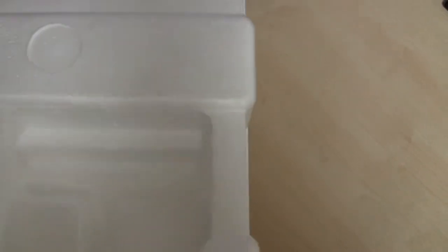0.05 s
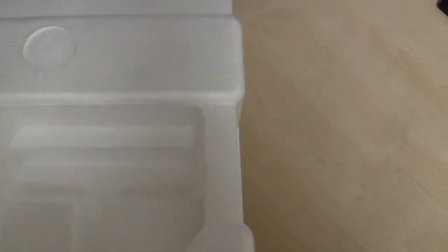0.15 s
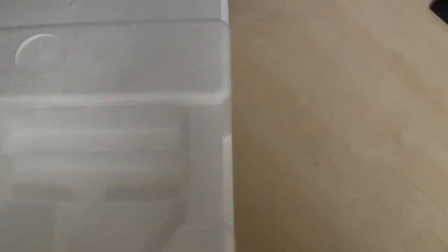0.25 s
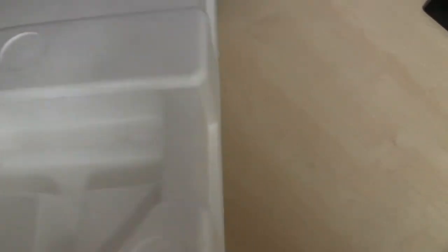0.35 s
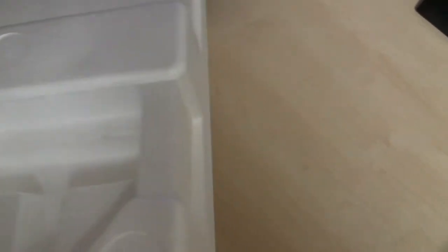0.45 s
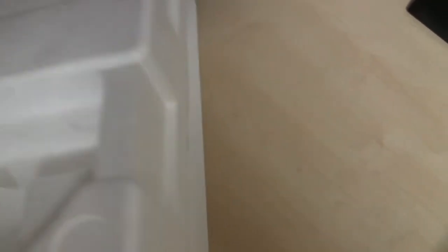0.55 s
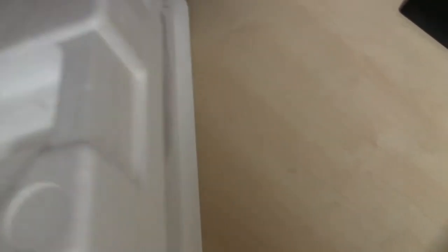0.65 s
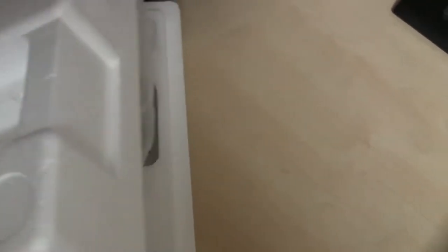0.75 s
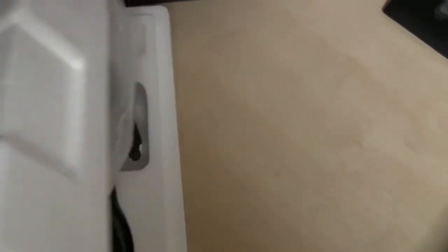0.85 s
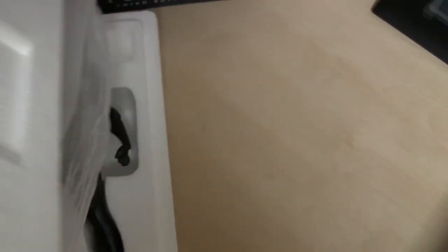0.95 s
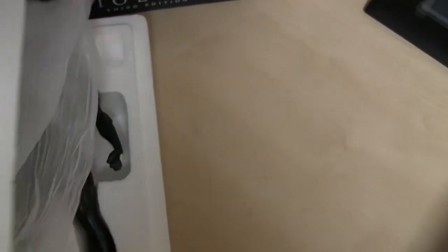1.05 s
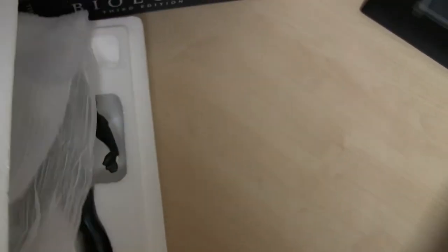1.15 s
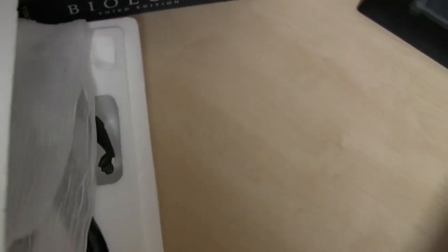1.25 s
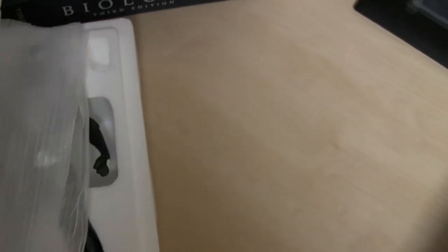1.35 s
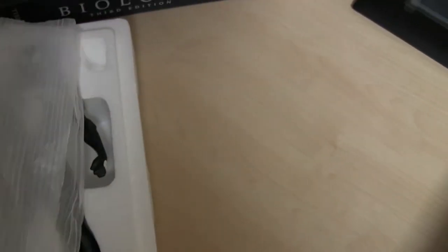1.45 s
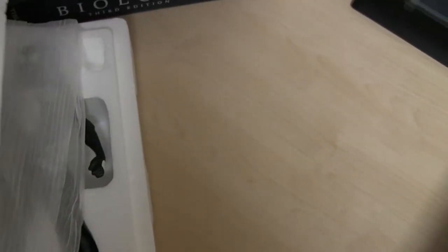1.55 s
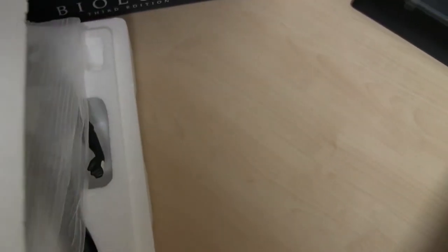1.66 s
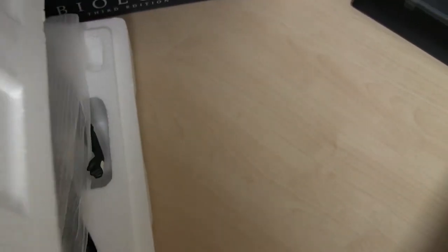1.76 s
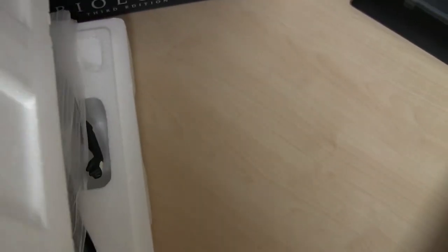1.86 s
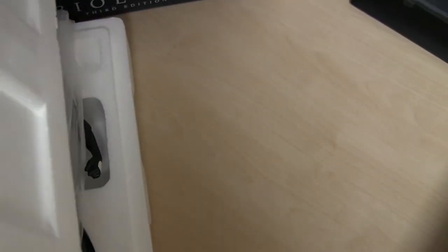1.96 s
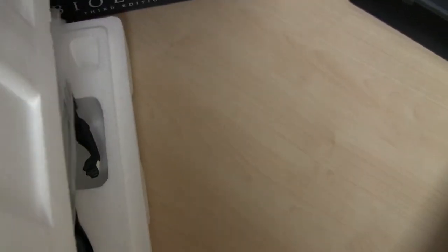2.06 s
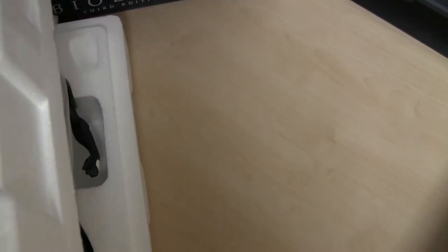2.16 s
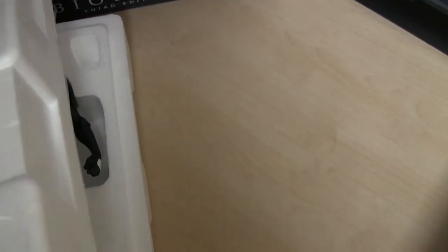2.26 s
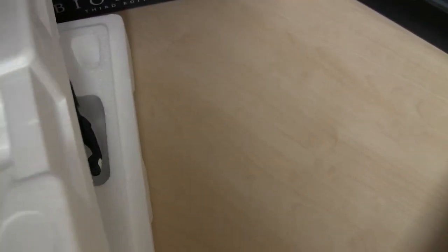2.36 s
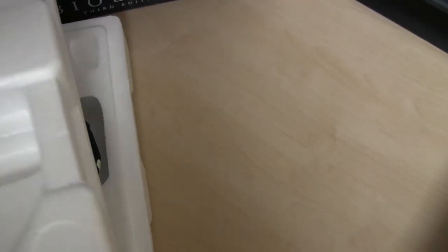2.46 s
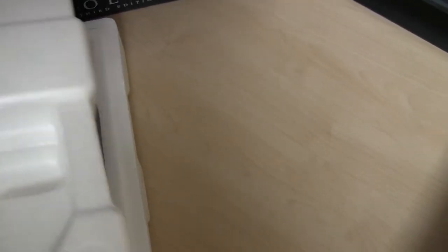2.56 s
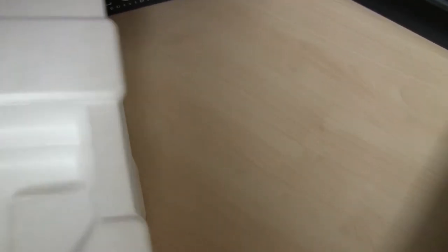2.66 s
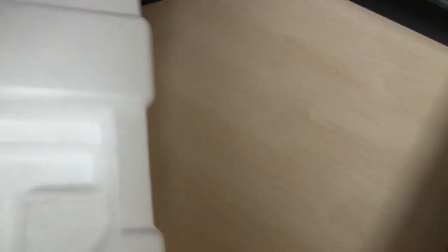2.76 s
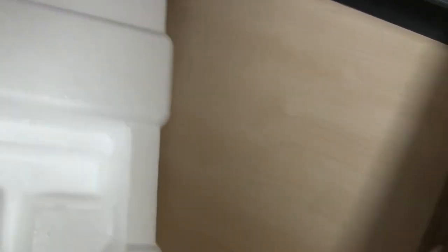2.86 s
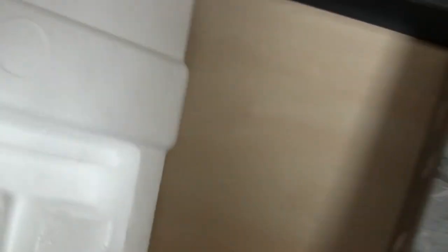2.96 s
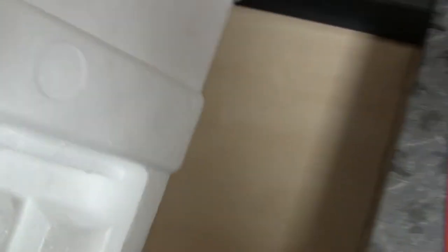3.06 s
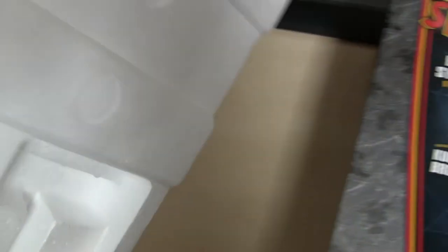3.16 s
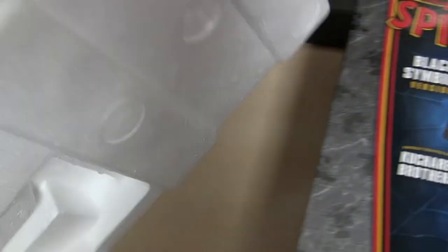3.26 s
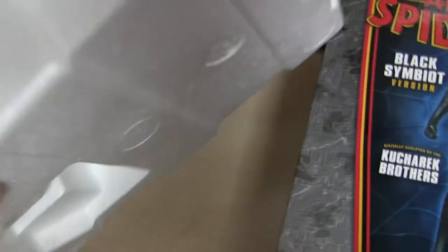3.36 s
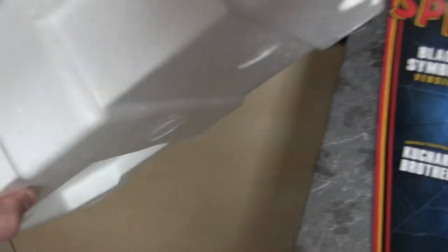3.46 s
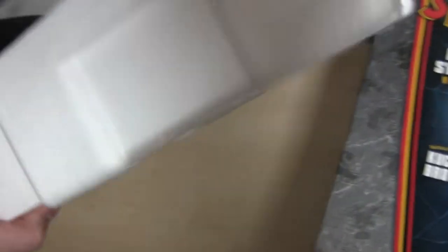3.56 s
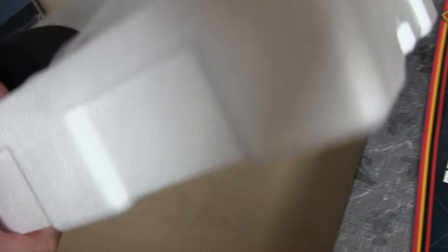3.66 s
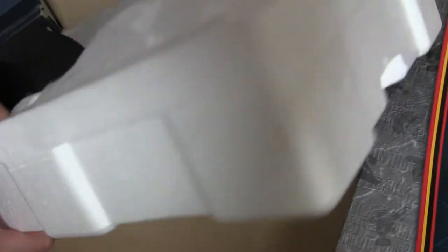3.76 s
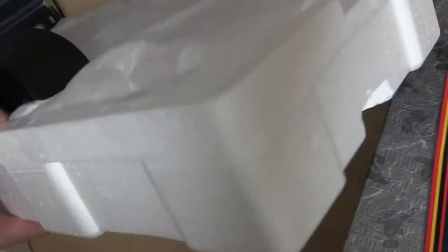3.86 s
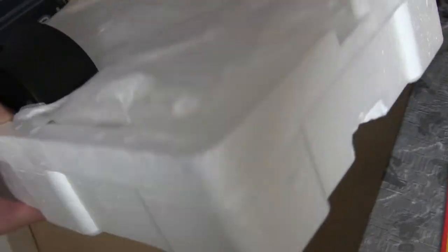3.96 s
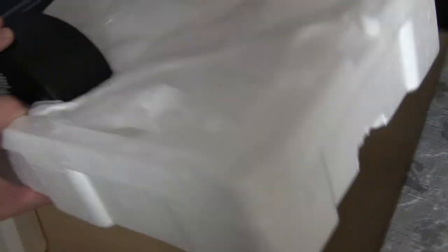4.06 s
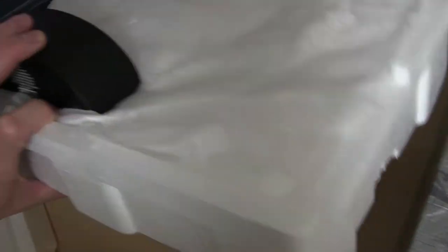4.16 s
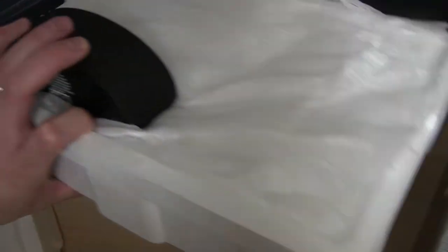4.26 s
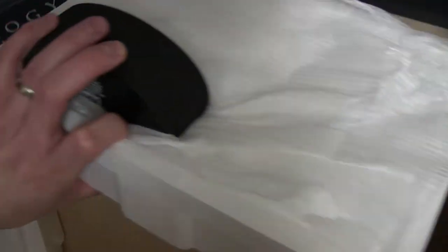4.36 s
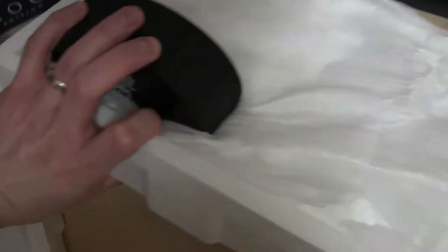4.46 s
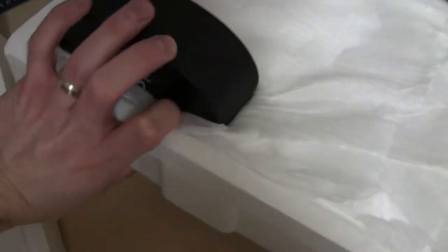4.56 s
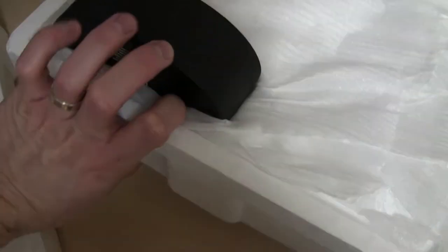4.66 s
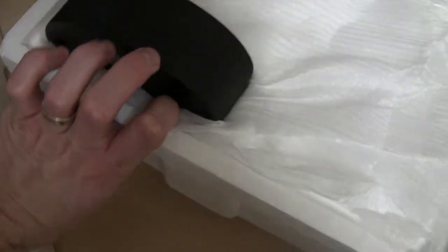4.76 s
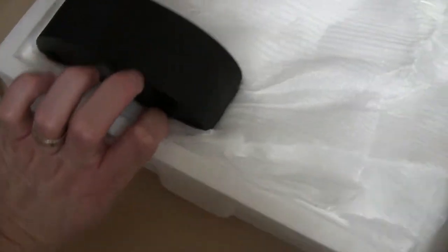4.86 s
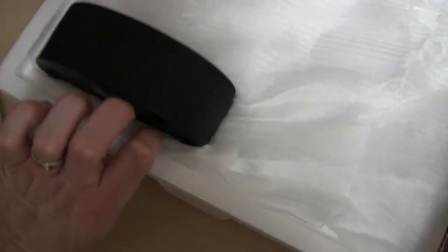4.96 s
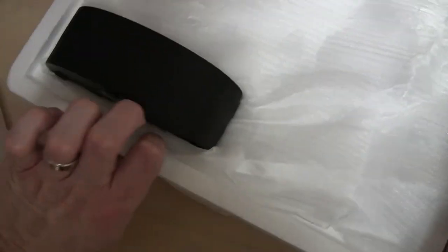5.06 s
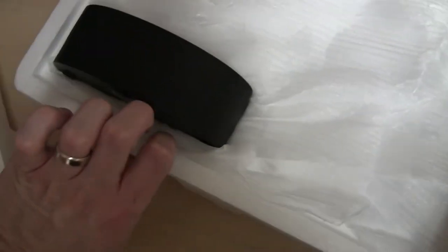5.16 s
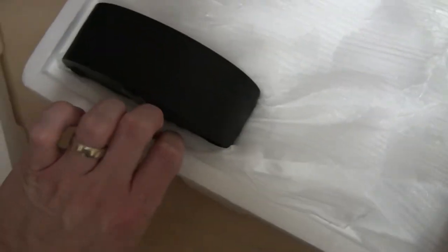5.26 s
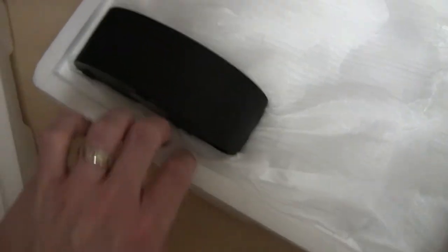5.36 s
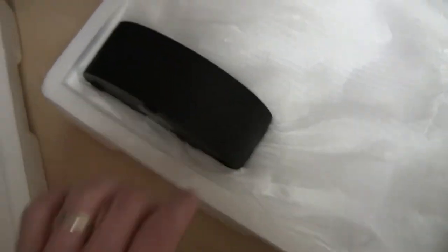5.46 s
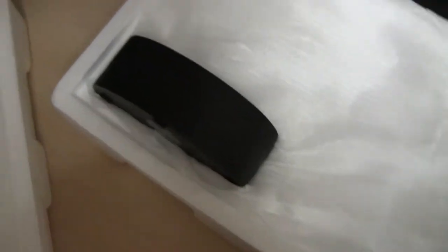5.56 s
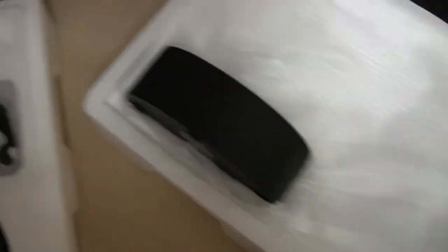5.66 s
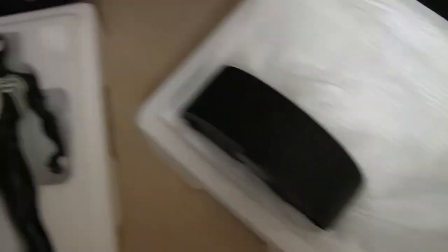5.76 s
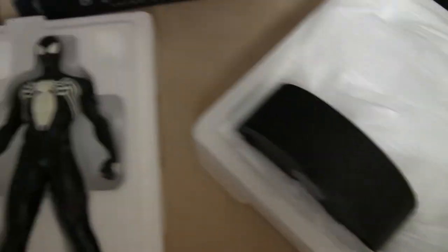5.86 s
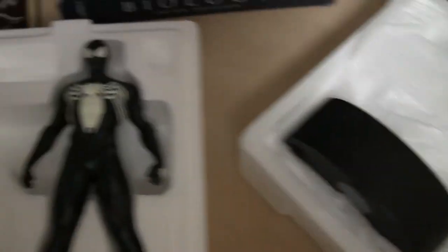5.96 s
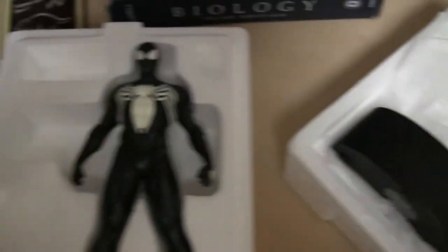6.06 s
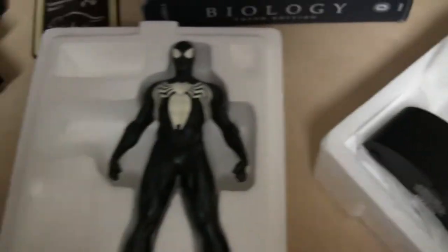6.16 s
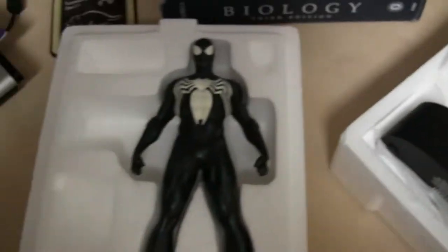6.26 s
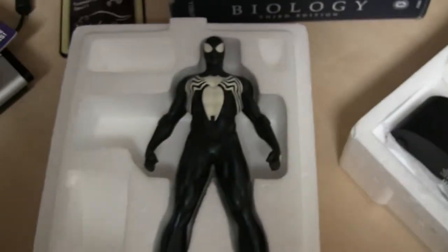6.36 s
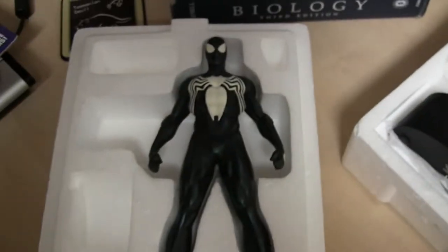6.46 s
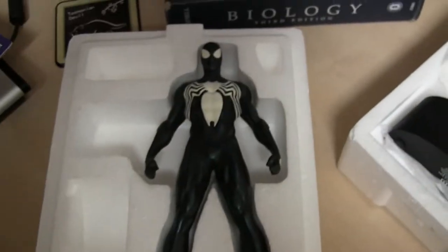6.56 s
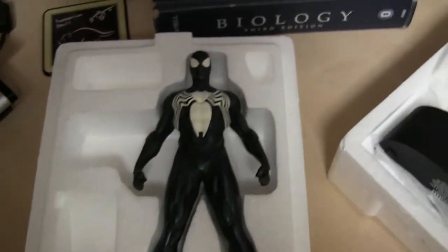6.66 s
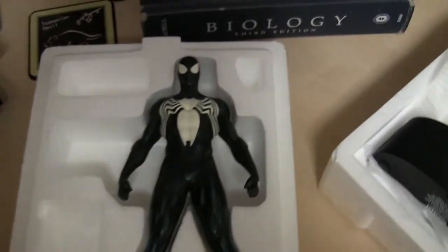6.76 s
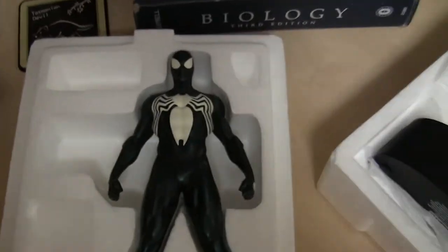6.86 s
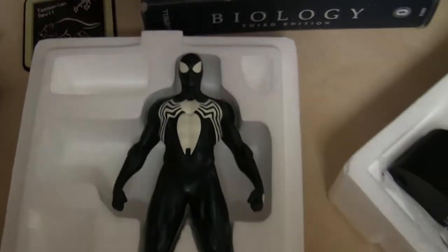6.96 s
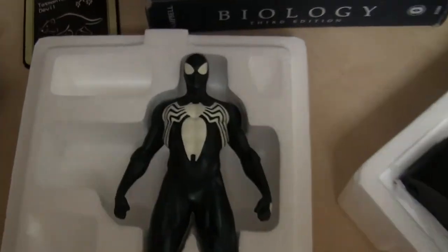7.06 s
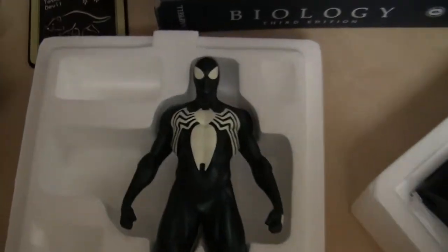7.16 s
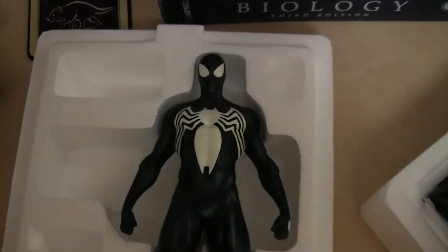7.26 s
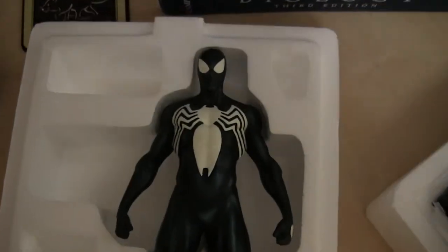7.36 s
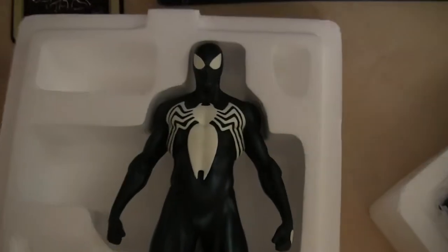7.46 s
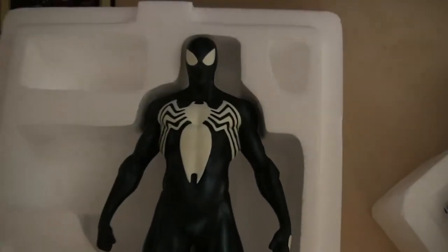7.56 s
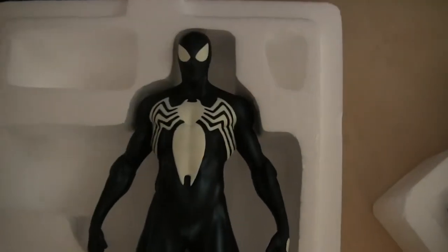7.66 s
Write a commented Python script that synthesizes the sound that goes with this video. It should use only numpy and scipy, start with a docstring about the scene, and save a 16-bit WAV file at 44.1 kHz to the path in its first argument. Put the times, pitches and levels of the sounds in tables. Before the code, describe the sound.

Foam packaging scrapes and creaks open in irregular bursts with rustling plastic wrap, then loud hollow thuds as it is set down in a small room.

```python
"""Foam rubs on foam and on plastic wrap as a two-part package is pulled open and handled on a desk.
Rubbing is bunched random clicks, filtered into scrape and hiss; stuck foam slips, creaks and groans.
Taps, hollow thuds and juddering knocks are noise puffs and fading tones as the box is opened and set down.
A faint fan is filtered noise; a tick and a thin squeak come near the end, all in a small room."""
import sys
import numpy as np
from scipy import signal
from scipy.fft import rfft, irfft, next_fast_len
from scipy.io import wavfile
from scipy.ndimage import map_coordinates

SR = 44100
rng = np.random.default_rng(int(sys.argv[2]) if len(sys.argv) > 2 else 0)


def digitize_waveform(pressure):
    """Quantize a signal to 16-bit integers and store it at the path in sys.argv[1].

    Rows of a 2-D input are taken as channels; values are limited to [-1, 1].
    """
    field = np.atleast_2d(pressure).T
    bounded = np.clip(field, -1, 1)
    quanta = np.round(bounded * 32767).astype(np.int16)
    wavfile.write(sys.argv[1], SR, quanta)


N = 340452
RING = SR // 4  # length of each short sound, in samples
TOP_HZ = 16100  # upper limit of the sound

# resonances of the box with the air in and around it: pitch_hz, level_db, t60_s (time to fall by 60 dB)
BOX_MODES = [(200.7, -6.5, .3), (233, -5, 0.63), (301, 2, 0.41), (450, 5.5, 0.28), (653, -4.5, 0.26),
             (788, 9, 0.35), (1200, -2, 0.31)]
# resonances of the foam walls: pitch_hz, width_hz, level_db
WALL_MODES = [(581, 69, 0.5), (978, 117, -1), (1472, 91, 1.5), (2080, 180, -0.5), (3270, 400, -14)]
# tone colour of a dry snap: frequency_hz, relative_level_db
SNAP_COLOUR = [(150, -6.5), (500, 0.5), (1300, 5.5), (2200, 3), (3500, -2.5), (7000, -8.5), (12000, -13),
               (16000, -27.5)]

DRAG_ATTACK_S, DRAG_RELEASE_S = 0.025, 0.033  # time to rise or fall by 20 dB


def amp(db):
    """Turn decibels into a plain gain."""
    return 10 ** (np.asarray(db) / 20)


def unit(x):
    """Scale a signal to an average power of 1."""
    return x / np.sqrt(np.mean(x ** 2) + 1e-20)


def along(points, hz):
    """Read a curve of (Hz, value) points along a logarithmic frequency axis."""
    point_hz, values = np.transpose(points)
    return np.interp(np.log(hz + 1), np.log(point_hz + 1), values)


def curve(rows):
    """Join (time, value) points into one value per sample."""
    times, values = np.transpose(rows)
    return np.interp(np.arange(N) / SR, times, values)


def fade(t60):
    """A quarter second of exponential decay, falling 60 dB in t60 seconds."""
    return np.exp(-np.log(1000) * np.arange(RING) / SR / t60)


def tone(hz, t60):
    """A damped vibration that builds up within its first cycle."""
    t = np.arange(RING) / SR
    build_up = 1 - np.exp(-np.pi * hz * t)
    return np.sin(2 * np.pi * hz * t) * fade(t60) * build_up


def add(track, s, sound):
    """Mix a sound into a track at time s."""
    part = track[max(round(s * SR), 0):][:len(sound)]
    part += sound[:len(part)]


def colour(x, spectrum):
    """Filter x to a spectrum, with no sound ahead of its cause."""
    m = 2 * next_fast_len(len(x) // 2 + 4096)
    gain = unit(amp(along(spectrum, np.fft.rfftfreq(m, 1 / SR))))
    # folding the cepstrum gives the filter that responds soonest
    cepstrum = irfft(np.log(gain))
    cepstrum[1:m // 2] *= 2
    cepstrum[m // 2 + 1:] = 0
    response = np.exp(rfft(cepstrum))
    return irfft(rfft(x, m) * response)[:len(x)]


def resonate(x, peaks):
    """Pass x through (Hz, width, dB) resonances of unit total power."""
    m = next_fast_len(len(x) + SR // 4)
    f = np.fft.rfftfreq(m, 1 / SR)
    response = 0
    for k, (centre, width, db) in enumerate(peaks):
        peak = 1j * f * width / (centre * centre - f * f + 1j * f * width)
        response = response + (-1) ** k * amp(db) * peak
    response = response / np.sqrt(np.mean(abs(response) ** 2))
    return irfft(rfft(x, m) * response, m)[:len(x)]


def highpass(x, hz):
    """Second-order bass cut."""
    return signal.sosfilt(signal.butter(2, hz, "high", fs=SR, output="sos"), x)


def wobble(rate):
    """A smooth random curve through `rate` random points a second."""
    knots = rng.standard_normal(int(N * rate / SR) + 4)
    return map_coordinates(knots, [np.arange(N) * rate / SR])


def beads(rate, scatter_db, clump_db):
    """Tiny releases of foam beads, of random size, bunched in clumps."""
    hits = rng.random(N) < rate / SR
    size_db = scatter_db * rng.standard_normal(N) + clump_db * wobble(160)
    return unit(hits * rng.standard_normal(N) * amp(size_db))


def burst(t60, spectrum):
    """A dying puff of coloured noise with the energy of its fade at half level."""
    puff = colour(rng.standard_normal(RING) * fade(t60), spectrum)
    return puff * np.linalg.norm(fade(t60)) / np.linalg.norm(puff) / 2


def pan(db):
    """Left and right gains for a left-minus-right level difference."""
    return amp(np.array([[.5], [-.5]]) * db)


def swell(peak, length):
    """Gain of a brief hand movement: it rises to its peak and eases off more slowly."""
    rise_share, edge_db, roundness = 0.37, 15, 1.19  # share spent rising, drop at the ends, shape of the top
    t = np.arange(N) / SR - peak
    away = np.maximum(-t / rise_share, t / (1 - rise_share)) / length
    return amp(-edge_db * np.minimum(away, 10) ** roundness)


def drag_gain(start, end, first_db, last_db):
    """Gain of a long drag: quick attack, a hold that changes evenly in dB, quick release."""
    t = np.arange(N) / SR
    outside = np.maximum((start - t) / DRAG_ATTACK_S, (t - end) / DRAG_RELEASE_S)
    return amp(np.interp(t, [start, end], [first_db, last_db]) - 20 * np.clip(outside, 0, 10))


def fan():
    """Moving air makes a steady noise; its airy band sinks, then swells as the microphone turns."""
    # tone colour of the steady noise: frequency_hz, relative_level_db
    fan_colour = [(15, -43), (30, -22), (102, -9.5), (270, -6.5), (796, -13), (1610, -11.5), (2910, -17),
                  (5000, -22), (16000, -31.5)]
    # level of the airy band: time_s, level_db
    airy_levels = [(0, -61), (5.6, -67.5), (6.4, -59), (7.4, -56.5), (7.72, -61.5)]
    bed = unit(colour(rng.standard_normal(N), fan_colour))
    band = [(1675, 534, 0)]
    whir = unit(resonate(resonate(rng.standard_normal(N), band), band))
    return amp(-56.5) * bed + amp(curve(airy_levels)) * whir


def room(x):
    """The walls of a small room answer with noise; each frequency dies at its own speed."""
    # how long the room rings: frequency_hz, t60_s
    room_decay = [(100, 0.45), (350, 0.24), (8000, 0.1)]
    hz, t, z = signal.stft(rng.standard_normal(SR // 2), SR, nperseg=256)
    decay = np.exp(-np.log(1000) * t / along(room_decay, hz)[:, None])
    tail = signal.istft(z * decay, SR, nperseg=256)[1]
    tail = np.pad(tail, (round(.005 * SR), 0))  # the answer starts 5 ms late
    return signal.fftconvolve(x, tail / np.linalg.norm(tail))[:N]


def echoes(x, above_hz, count=14):
    """The desk and the foam faces throw back weak copies 1 to 12 milliseconds later."""
    out = np.zeros(N)
    for delay, sign in zip(rng.uniform(.001, .012, count), rng.choice([-1, 1], count)):
        add(out, delay, sign * x / np.sqrt(count))
    return highpass(out, above_hz)


def cavity(x):
    """Reflections inside the box pick out narrow resonances, which shift as the halves move."""
    level_db, patterns_per_s = -5.5, 3
    place = np.arange(N) / SR * patterns_per_s
    shifting = np.zeros(N)
    for k in range(int(place[-1]) + 2):
        crossfade = np.sqrt(np.clip(1 - abs(place - k), 0, 1))
        shifting += crossfade * echoes(x, above_hz=840)
    return (x + amp(level_db) * shifting) / np.hypot(1, amp(level_db))


def squeak():
    """One thin, wavering tone high in the treble, its pitch rising and sinking."""
    # path of the squeak: time_s, pitch_hz
    squeak_path = [(7.03, 9650), (7.15, 10050), (7.2, 10900), (7.28, 9450), (7.52, 8700)]
    level_db = -78
    hz = curve(squeak_path) * (1 + .003 * wobble(60))
    phase = 2 * np.pi * np.cumsum(hz) / SR
    wavering = unit(np.sin(phase) * amp(3 * wobble(25)))
    return drag_gain(squeak_path[0][0], squeak_path[-1][0], level_db, level_db) * wavering


def tick():
    """Hard plastic gives one dry click with two brief tones."""
    # the click: start_s, level_db (of each of its three parts)
    click = (6.626, -37.5)
    out = np.zeros(N)
    add(out, click[0], amp(click[1]) * (tone(2630, 0.02) + tone(4740, 0.012) + burst(0.011, SNAP_COLOUR)))
    return out


def judder():
    """The box judders as it is opened and again after the heavy thud, in many small uneven knocks."""
    # runs of knocks: start_s, end_s, first_level_db, last_level_db (before scatter and trim), middle_pitch_hz
    knock_runs = [(0.1, 0.18, -18.5, -19, 780), (5.074, 5.226, -16.5, -26.5, 820),
                  (5.07, 5.16, -20, -27.5, 410)]
    out = np.zeros(N)
    for start, end, first_db, last_db, hz in knock_runs:
        for s in np.arange(start, end, .004):
            db = np.interp(s, [start, end], [first_db, last_db]) + rng.normal(0, 4.1) - 3.5
            knock = tone(hz * np.exp(rng.normal(0, 0.36)), 8 / hz)
            add(out, s + rng.uniform(0, .004), rng.choice([-1, 1]) * amp(db) * knock)
    return highpass(highpass(out, 130), 130)


def box_ring(hz, spread):
    """The box modes near the pitch of a blow ring on after it, detuned a little by the grip."""
    detune = np.exp(rng.normal(0, .05))
    out = 0
    for f, db, t60 in BOX_MODES:
        nearness = np.exp(-(np.log(f / hz) / spread) ** 2)
        out = out + amp(db + rng.normal(0, 1.5)) * nearness * tone(f * detune, t60)
    return out


def thuds():
    """A blow pushes the light box for a few cycles, with a dull puff and a ring of its modes."""
    # dull, hollow blows on the whole box, some very loud: start_s, level_db, pitch_hz, t60_s, ring_over_blow_db
    blows = [(3.397, -18.5, 120, 0.082, -27), (3.409, -23, 470, 0.038, -24.5),
             (3.4138, -16, 231, 0.057, -29), (4.4895, -2.5, 318, 0.03, -42), (4.4901, -15, 430, 0.043, -38),
             (4.504, -8.5, 274, 0.045, -48), (5.0517, -3, 1080, 0.026, -33),
             (5.0523, -2.5, 750, 0.041, -31), (5.0595, -8, 624, 0.052, -30), (5.053, -19.5, 189, 0.11, -22),
             (5.056, -32, 76.2, 0.25, -29), (5.061, -12, 334, 0.052, -24.5),
             (5.099, -16.5, 680, 0.027, -29)]
    out = np.zeros(N)
    for s, db, hz, t60, ring_db in blows:
        puff = burst(0.049, [(hz / 7, -38), (hz, 0), (hz * 1.24, -8), (hz * 4, -25), (hz * 16, -60)])
        ring = box_ring(hz, spread=0.65)
        add(out, s, amp(db) * (tone(hz, t60) + amp(ring_db) * ring + amp(-3.0) * puff))
    return highpass(out, 55)  # so light a box radiates no deep bass


def ping():
    """The foam walls ring for a moment, a little differently at each contact."""
    out = 0
    for f, width, db in WALL_MODES:
        out = out + amp(db + rng.normal(0, 1.5)) * tone(f * np.exp(rng.normal(0, 0.02)), 2 / width)
    return out


def taps():
    """The halves catch: a dry snap, a ping of the walls and a short hollow knock of the shell."""
    # contacts: start_s, snap_level_db, hollow_knock_level_db
    contacts = [(0.0836, -15, -17.5), (0.090, -14.5, -20), (.117, -26, -32), (1.0278, -26.5, -30.5),
                (1.057, -29, -34), (1.074, -23, -33), (1.297, -25.5, -34), (1.489, -35.5, -32),
                (1.630, -27.5, -30.5), (1.689, -28, -29.5), (1.835, -16.5, -29), (1.944, -21.5, -32.5),
                (2.173, -20, -25), (2.354, -27.5, -36.5), (2.434, -25.5, -34), (3.766, -28.5, -42),
                (4.281, -19.5, -46), (4.783, -13.5, -28), (5.764, -36.5, -50)]
    out = np.zeros(N)
    for s, snap_db, knock_db in contacts:
        add(out, s, amp(snap_db) * (burst(0.036, SNAP_COLOUR) + amp(-23.0) * ping()))
        grip = np.exp(rng.normal(0, 0.048))  # the grip detunes the shell
        knock = amp(-2) * tone(450 * grip, 0.055)
        knock -= amp(-7) * tone(315 * grip, 0.065)
        knock += amp(-9) * tone(640 * grip, 0.035)
        add(out, s, amp(knock_db) * knock)
    return out


def groans():
    """Fast stick and slip keeps one resonance of the shell sounding, rough in pitch and level."""
    # groans: start_s, end_s, level_db, pitch_hz
    groan_list = [(0.131, 0.187, -31, 436), (0.157, 0.208, -39, 199), (4.65, 4.823, -38, 600)]
    jitter, rough_db, rough_rate = 0.0393, 2.5, 140  # share of the pitch, level scatter, changes a second
    out = np.zeros(N)
    for start, end, db, hz in groan_list:
        phase = 2 * np.pi * np.cumsum(hz * (1 + jitter * wobble(rough_rate))) / SR
        rough_tone = unit(np.sin(phase) * amp(rough_db * wobble(rough_rate)))
        out += drag_gain(start, end, db, db) * rough_tone
    return out


def creaks():
    """Under a steady pull the slips follow each other almost evenly."""
    # runs of stick and slip: start_s, end_s, slips_per_s, first_level_db, last_level_db (before scatter)
    creak_runs = [(1.737, 1.848, 118, -23.5, -19), (4.5595, 4.587, 100, -13.5, -14.5)]
    out = np.zeros(N)
    for start, end, rate, first_db, last_db in creak_runs:
        for s in np.arange(start, end, 1 / rate):
            db = np.interp(s, [start, end], [first_db, last_db]) + rng.normal(0, 0.69)
            release = burst(0.012, SNAP_COLOUR) + amp(-16) * ping() + amp(-11) * tone(490, .025)
            add(out, s + rng.normal(0, 0.00079), amp(db) * release)
    return out


def slips(count=3):
    """Stuck foam lets go in a few quick, weakening rasps, and the walls ring just after the first."""
    # single slips of foam on foam: start_s, level_db (before the trims below), t60_s
    slip_list = [(.397, -27, 0.085), (.435, -30, 0.11), (1.188, -35.5, 0.086), (3.403, -22.5, 0.079),
                 (3.478, -16.5, 0.027), (3.487, -14.5, 0.01715), (3.495, -21.5, 0.073),
                 (3.512, -21, 0.0221), (4.593, -15, 0.03), (4.645, -13.5, 0.025), (4.702, -9, 0.017),
                 (4.7139, -8.5, 0.015), (4.726, -10, 0.012), (4.743, -8.5, 0.025), (4.753, -8, 0.014)]
    # tone colour of a slip: frequency_hz, relative_level_db
    slip_colour = [(200, -1), (600, 4), (1480, 2), (2100, 0.5), (2550, -2), (3200, 2), (6200, -4),
                   (6680, 4.5), (7400, -1.5), (9900, -1.5), (11700, -7), (15500, -12)]
    step_s = 0.0017  # between the small releases that make up one slip
    out = np.zeros(N)
    for s, db, t60 in slip_list:
        for k in range(count):
            add(out, s + k * step_s, amp(db - 1.5 - 3.8 * k) * burst(t60, slip_colour))
        add(out, s + .0015, amp(db - 19.5) * ping())
    return out


def wrap():
    """Thin plastic sliding over foam sings in narrow high bands, swelling until it comes free."""
    # glides of the wrap: start_s, peak_s, end_s, level_db (at the peak), centre_hz, width_hz
    glides = [(3.72, 4.045, 4.08, -47, 5300, 2400), (3.91, 4.05, 4.084, -39, 9750, 3300),
              (4.995, 5.034, 5.055, -25.5, 12300, 5000)]
    out = np.zeros(N)
    for start, peak, end, db, hz, width in glides:
        speed = np.interp(np.arange(N) / SR, [start, peak, end], [0, 1, 0])
        band = [(hz, width, 0)]
        grains = beads(rate=6000, scatter_db=4.0, clump_db=1.5)
        out += amp(db) * speed * unit(resonate(resonate(grains, band), band))
    return out


def crinkles(scrape_db):
    """Single creases flip as the wrap is dragged, each with its own pitch and size."""
    creases_per_s, over_scrape_db, scatter_db = 140, 5.5, 5
    middle_hz, log_spread, cycles = 2920, .65, 8.1  # cycles until a crease has died by 60 dB
    out = np.zeros(N)
    flips = (rng.random(N) < creases_per_s / SR) & (scrape_db > -55)
    for at in np.flatnonzero(flips):
        hz = min(middle_hz * np.exp(log_spread * rng.standard_normal()), TOP_HZ)
        db = scrape_db[at] + over_scrape_db + scatter_db * rng.standard_normal()
        add(out, at / SR, amp(db) * tone(hz, cycles / hz))
    return out


def handling():
    """Levels in dB of scrape, hiss and shudder: hand movements add in power under a wavering grip."""
    # Levels in these three tables are ahead of the grip's waver and the trims in rubbing().
    # long drags over foam and wrap: start_s, end_s, first_level_db, last_level_db, hiss_over_scrape_db
    drags = [(.088, 0.227, -30, -43, -0.5), (0.495, .8, -43, -57, 0.5), (0.844, 1.177, -55.5, -50, -5),
             (1.548, 1.848, -46.5, -35, -6.5), (1.851, 2.317, -42, -52.5, -7.5),
             (2.441, 3.05, -53, -68.5, 0.5), (3.41, 3.677, -39.5, -48, -1.5),
             (3.717, 4.057, -53, -52.5, 3.5), (4.299, 4.49, -42.5, -44, 1.5),
             (4.497, 5.047, -31, -33, -2.5), (5.084, 5.17, -48.5, -37.5, -8), (5.181, 5.301, -47, -52.5, 9),
             (5.388, 5.416, -39, -41, 5)]
    # brief scuffs as the grip shifts: peak_s, length_s, scrape_level_db, hiss_over_scrape_db
    scuffs = [(.003, 0.084, -36.5, -0.5), (0.112, 0.036, -35.5, 15), (0.31, 0.14, -44, 8.5),
              (0.5, 0.035, -46, 14.5), (0.643, 0.13, -45, 6.5), (0.783, 0.055, -48, 8.5),
              (1.306, 0.076, -38, -4), (1.823, 0.17, -38, 4.5), (2.06, 0.025, -45, 8.5),
              (2.121, 0.051, -41.5, 7), (2.249, 0.19, -41, 3.5), (2.448, 0.05, -43.5, 2.5),
              (2.708, 0.099, -47, -5), (3.03, 0.092, -51.5, -1), (4.286, 0.028, -38, 9.5),
              (4.575, 0.13, -26, -3), (5.013, 0.081, -32.5, 12.5), (5.367, 0.028, -36, 2.5)]
    # the hollow shell flexes and shudders: peak_s, length_s, level_db
    flexes = [(0.14, 0.084, -35.5), (0.92, 0.26, -51), (1.062, 0.1, -46)]
    shudder_follow_db = -18  # the shell's shudder under any scrape
    waver_db, waver_rate = 1.2, 28  # unsteady hand pressure: depth, changes a second
    strokes = [(drag_gain(*row), hiss_db) for *row, hiss_db in drags]
    strokes += [(amp(db) * swell(peak, length), hiss_db) for peak, length, db, hiss_db in scuffs]
    scrape = sum(gain ** 2 for gain, _ in strokes)
    hiss = sum((gain * amp(hiss_db)) ** 2 for gain, hiss_db in strokes)
    shudder = scrape * amp(shudder_follow_db) ** 2
    shudder = shudder + sum((amp(db) * swell(peak, length)) ** 2 for peak, length, db in flexes)
    return 10 * np.log10([scrape, hiss, shudder]) + waver_db * wobble(waver_rate)


def rubbing():
    """Foam beads catch and let go: coarse ones ring the walls, fine ones hiss, and the shell shudders."""
    # tone colours of the scrape, the hiss and the hollow shell: frequency_hz, relative_level_db
    scrape_colour = [(200, -35.5), (450, -11), (800, 0.5), (1500, 1), (1800, -3.5), (2100, -6),
                     (2500, -10.5), (3100, -7.5), (5000, -9), (12000, -64.5)]
    hiss_colour = [(1000, -30), (2500, 0), (5000, 0.5), (7500, -1), (10500, -4.5), (13000, -5.5),
                   (16000, -19)]
    hollow_colour = [(30, -37), (70, -20), (130, -14), (220, -9), (320, -8.5), (450, -9.5), (600, -3),
                     (1200, -35.5)]
    scrape_db, hiss_db, shudder_db = handling()
    grit = colour(beads(rate=3500, scatter_db=0, clump_db=4.0), scrape_colour)
    wall_ring = resonate(beads(rate=1100, scatter_db=2.0, clump_db=1.5), WALL_MODES)
    scrape = unit(grit + wall_ring)
    hiss = unit(colour(beads(rate=12000, scatter_db=1.0, clump_db=2.3), hiss_colour))
    hollow = colour(beads(rate=1200, scatter_db=2.0, clump_db=2.0), hollow_colour)
    shell_modes = [(f, 11 / t60, db) for f, db, t60 in BOX_MODES]
    shudder = unit(unit(hollow) + amp(5.5) * unit(resonate(hollow, shell_modes)))
    out = amp(scrape_db - 1.0) * scrape
    out += amp(hiss_db - 2.0) * hiss
    out += amp(shudder_db + 4.0) * shudder
    return out + crinkles(scrape_db)  # the wrap creases along with the scrape


def scene():
    """Left and right share the direct sound and most of the room; reflections and fan noise part them."""
    # where the box is held: time_s, left_minus_right_db
    box_place = [(2.2, 0.9), (3.4, 0), (5.1, -0.7)]
    friction = cavity(rubbing() + wrap())
    small = highpass(taps() + slips() + creaks() + tick() + squeak(), 210)  # light contacts carry no bass
    direct = friction + small + groans() + thuds() + judder()
    mid = direct + amp(-18) * room(direct)
    # the side signal is added on the left and subtracted on the right
    side = amp(-12.0) * echoes(highpass(direct, 2617), above_hz=2870)
    side += amp(-19.0) * echoes(direct, above_hz=60)
    side += amp(-29.5) * room(direct)
    box = np.array([mid + side, mid - side]) * pan(curve(box_place))
    fan_mid, fan_side = fan(), amp(-8.0) * fan()
    fan_noise = np.array([fan_mid + fan_side, fan_mid - fan_side]) * pan(0.5)
    return box + fan_noise


def record(dry):
    """Round off the highest peaks, then keep nothing from the upper band limit on."""
    held = dry / (1 + dry ** 8) ** (1 / 8)
    m = next_fast_len(N + SR // 4)
    below_limit = np.fft.rfftfreq(m, 1 / SR) < TOP_HZ
    return irfft(rfft(held, m) * below_limit, m)[:, :N]


dry = scene()
out = record(dry)
digitize_waveform(out)
```